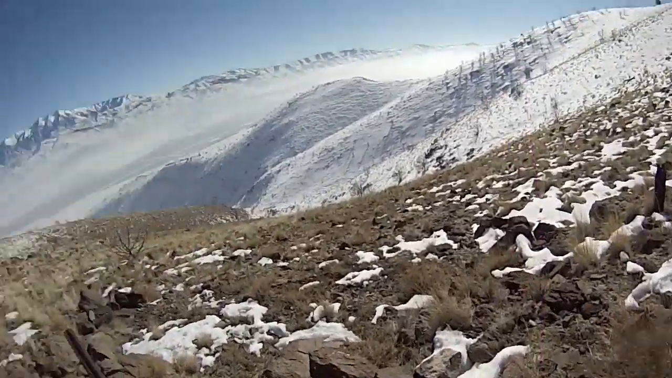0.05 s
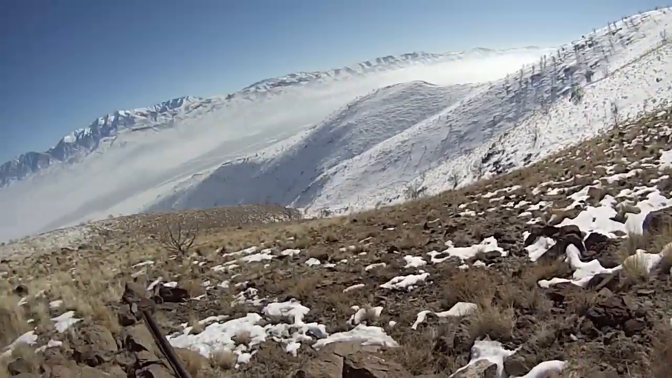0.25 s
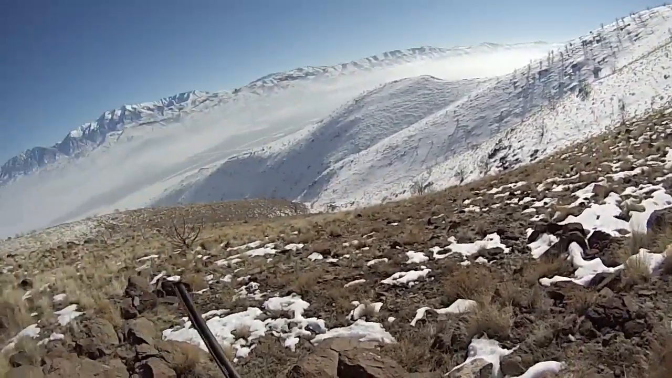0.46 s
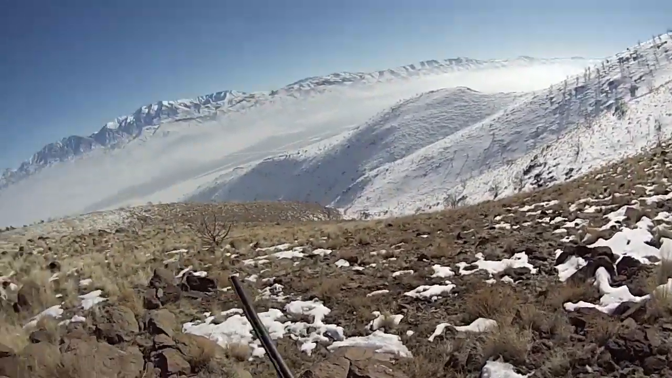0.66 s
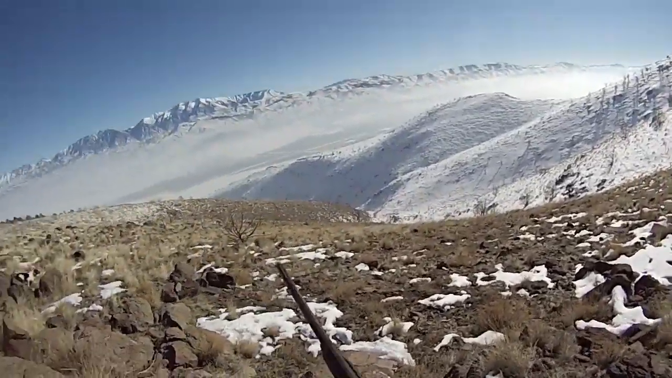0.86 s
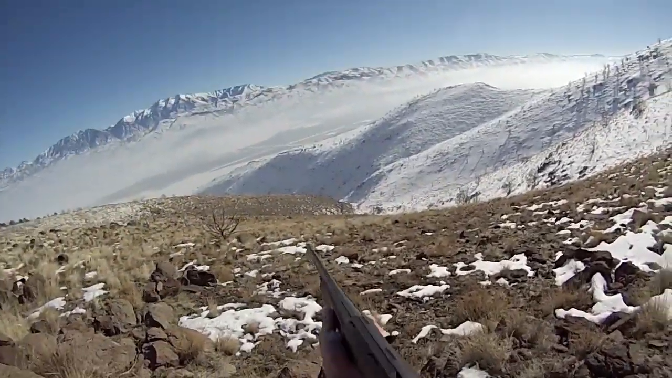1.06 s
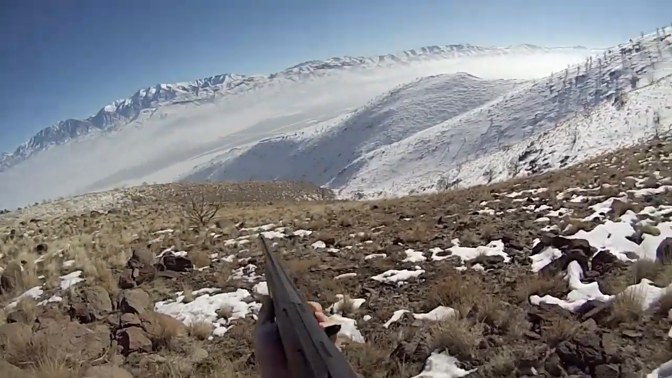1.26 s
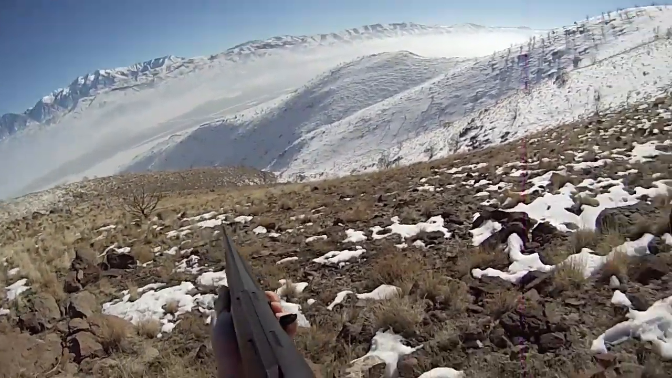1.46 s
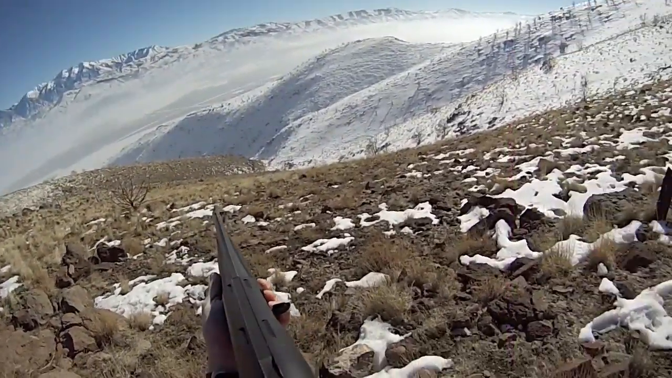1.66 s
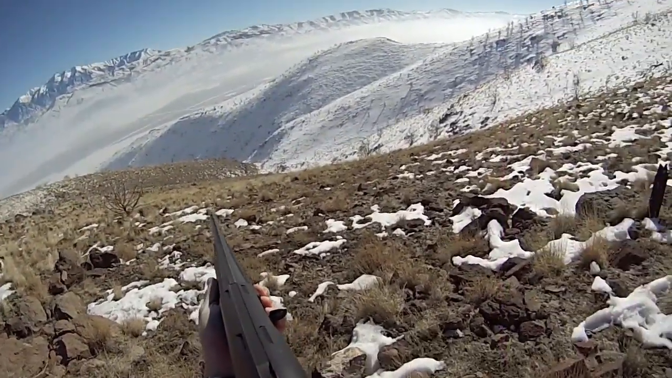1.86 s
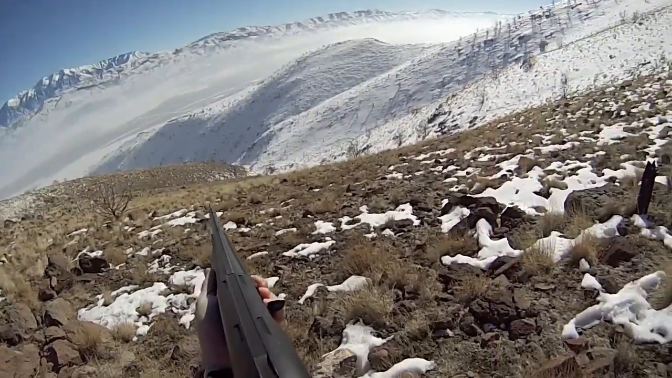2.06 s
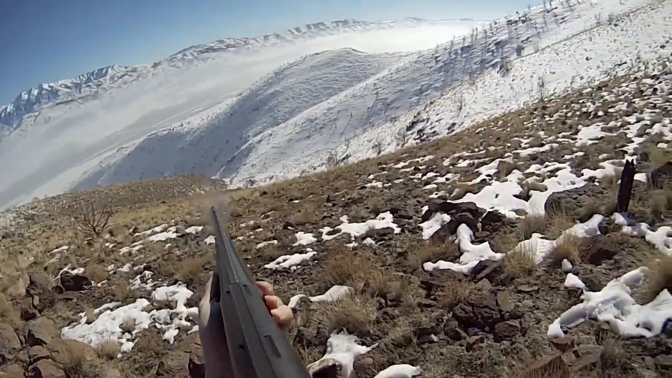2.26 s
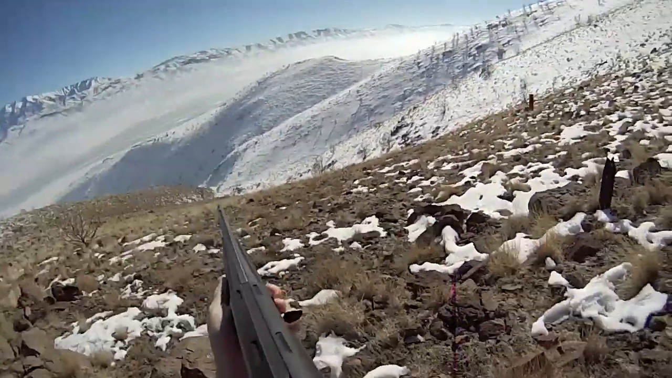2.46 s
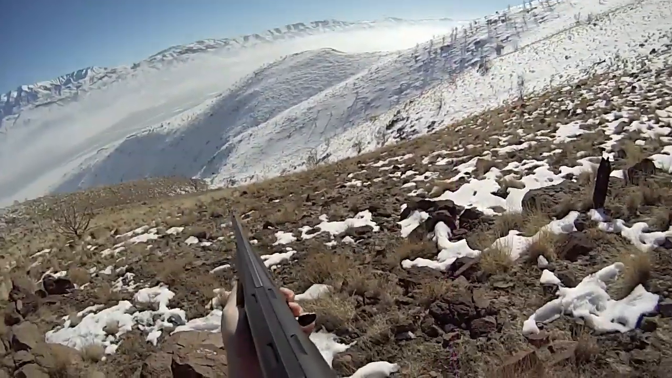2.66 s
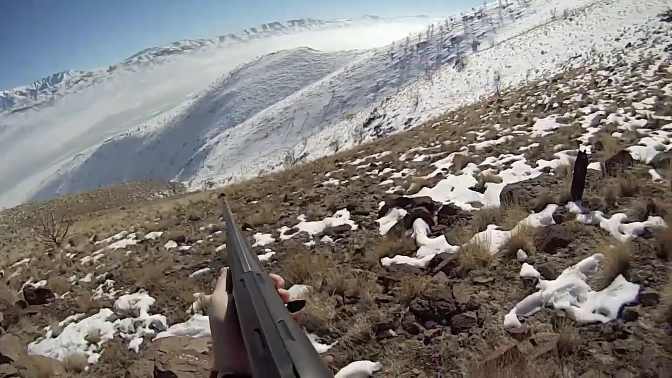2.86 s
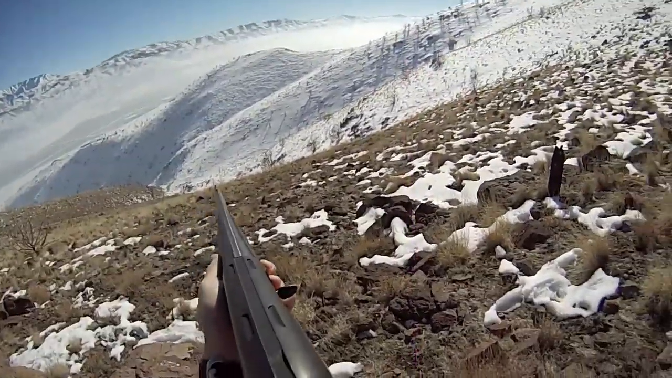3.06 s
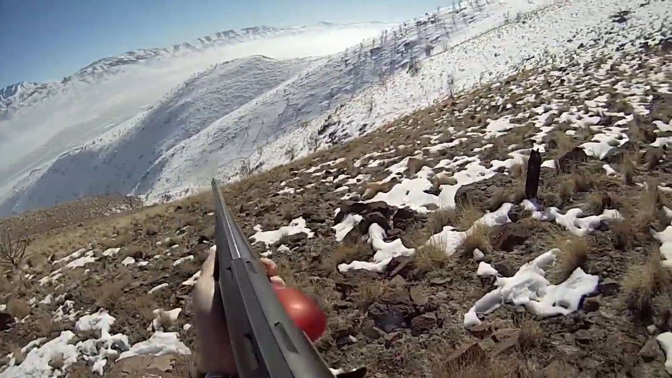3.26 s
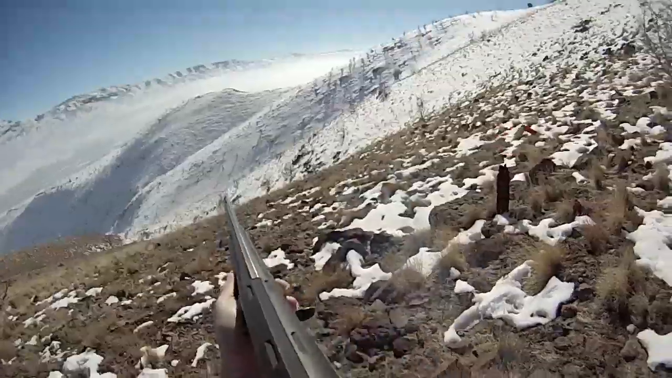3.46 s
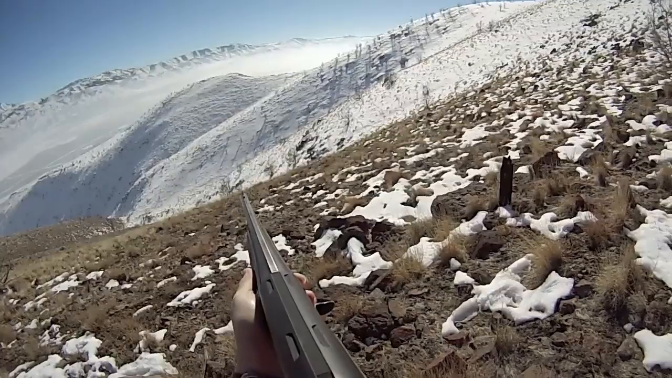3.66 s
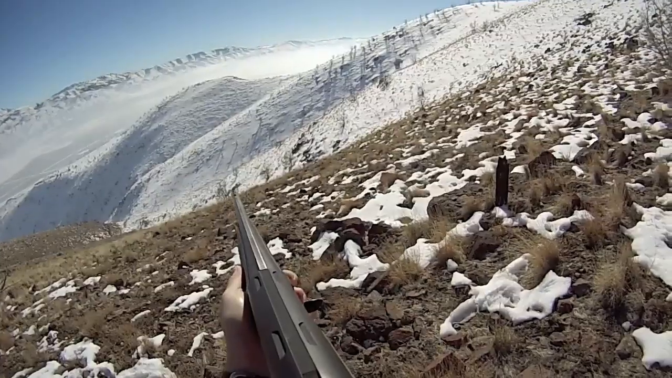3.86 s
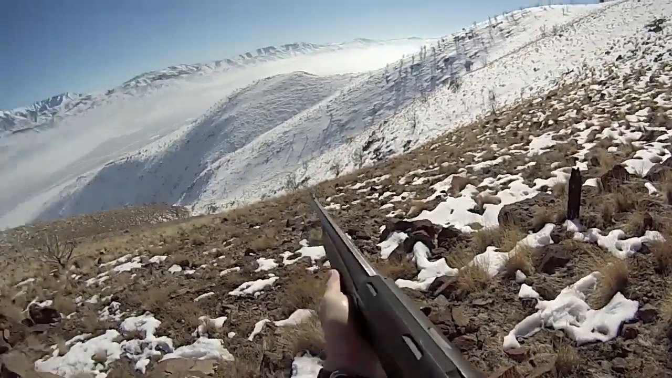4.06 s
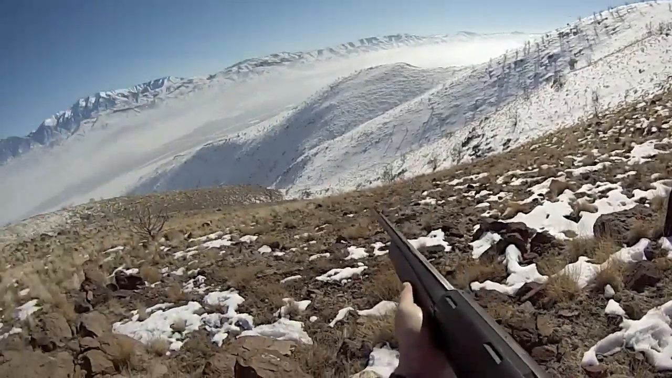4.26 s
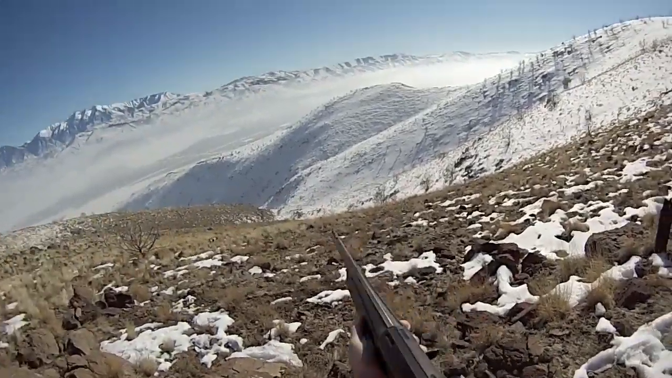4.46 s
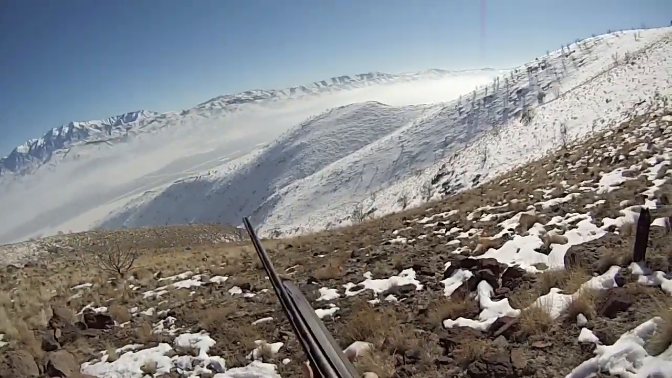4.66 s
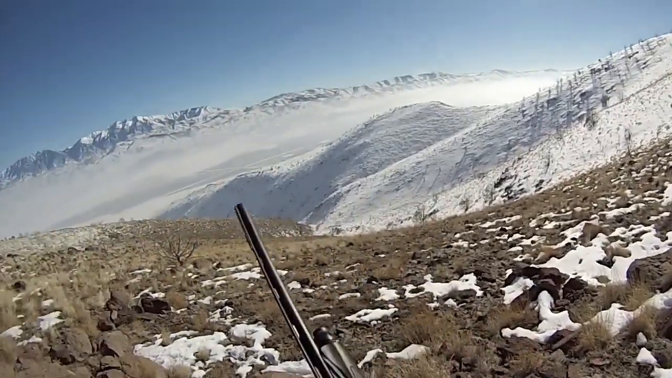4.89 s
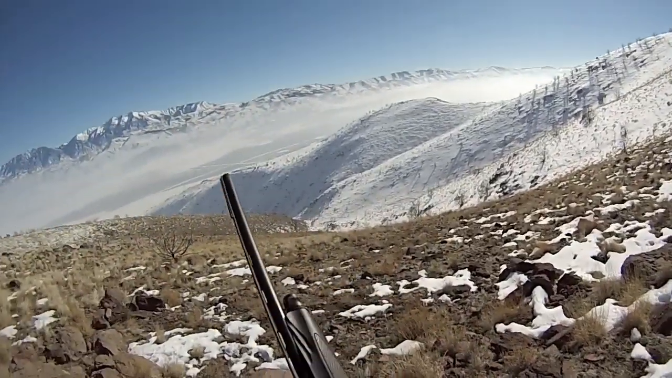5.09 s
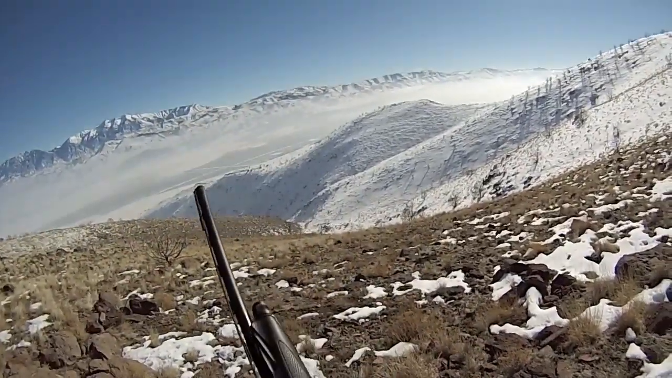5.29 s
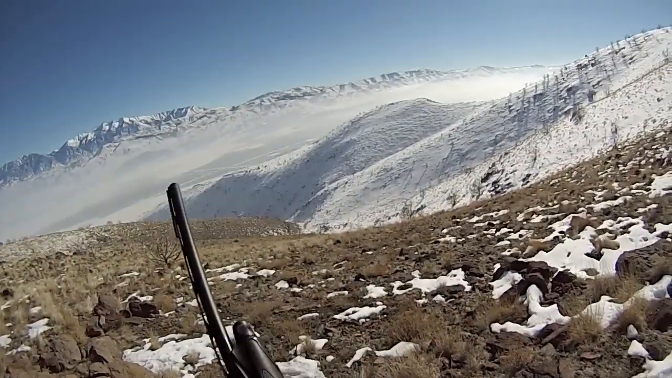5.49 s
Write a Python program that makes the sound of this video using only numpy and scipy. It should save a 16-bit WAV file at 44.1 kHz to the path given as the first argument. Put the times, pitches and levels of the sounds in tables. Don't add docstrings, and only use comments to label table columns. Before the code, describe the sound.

Two overloaded shotgun blasts a second apart, each with bolt clack and thin hillside echo, over low wind buffeting and small handling clicks.

```python
import sys
import numpy as np
from scipy import signal
from scipy.fft import rfft, irfft
from scipy.io import wavfile
from scipy.ndimage import uniform_filter1d

SR = 44100
rng = np.random.default_rng(int(sys.argv[2]) if len(sys.argv) > 2 else 0)


def transcribe(signal):
    frames = np.atleast_2d(signal).T
    limited = np.clip(frames, -1, 1)
    pcm = np.round(limited * 32767).astype(np.int16)
    wavfile.write(sys.argv[1], SR, pcm)


def makeup_ratio(level_db):
    decades = np.asarray(level_db, float) / 20
    return 10 ** decades


N = 243873
T = np.arange(N) / SR

# start_s, level_db, first_pitch_hz, last_pitch_hz, tail_db
BLASTS = [
    (2.3459, 6.5, 517.2, 1624, -13),
    (3.3412, 8, 526.8, 2000, -13.5),
]
BLAST_S, HAMMER_LEAD_S, STOCK_LEAD_S = .0066, .0098, .0036
# centre_s, peak_db, pitch_hz, length_s, direction (+ push, - pull)
JOLTS = [
    (2.359, -16.5, 25.23, 0.017, 0.65),
    (2.446, -11.5, 31, 0.013, -0.79),
    (2.459, -18, 30, .008, 1),
    (2.4728, -9, 45.8, 0.0085, -1.1),
    (2.4728, -27.5, 119, 0.0038, -1.24),
    (3.348, -20, 25.8, 0.0064, 1),
    (3.435, 0, 67.5, 0.0064, 0.22),
    (3.433, -21, 190, 0.0038, 0.75),
    (3.441, -6, 36.7, 0.019, -0.79),
]
# start_s, level_db, t60_s
RUMBLES = [
    (1.299, -49, .15),
    (1.40, -46, .12),
    (2.349, -30.5, 0.3),
    (2.449, -46, 0.75),
    (3.345, -36, 0.13),
    (3.428, -45, 0.71),
]
# start_s, length_s, level_db, fall_s
TRAVEL = [
    (2.361, .105, -37.5, 0.064),
    (3.353, .1, -36.5, .07),
]
# start_s, level_db, length_s
SLAMS = [
    (2.4607, -27, 0.015),
    (3.4500, -32.5, 0.0077),
]
# pitch_hz, t60_s, first_level_db, second_level_db
STEEL_RING = [(3370, .2, -68, -61), (4200, .55, -56, -57), (4721, .55, -63, -57), (5340, .22, -54, -66),
              (5857, .4, -70, -63)]
# level_db, t60_s
ECHO = [
    (-52.5, 1.7),
    (-51.5, 2.06),
]
ECHO_DELAY_S, ECHO_RISE_S, ECHO_TREBLE_DB, ECHO_TREBLE_T60_S = 0.22, 0.028, -4.5, 0.55
# pitch_hz, width_hz, level_db
ECHO_BODY = [
    [(870, 370, -10), (1450, 200, 1.5), (2020, 100, 0), (2400, 360, -7.5)],
    [(3069, 680, -3), (4750, 1700, -6.5), (7040, 1600, -13.5)],
]
# lag_s, peak_db, pitch_hz
RETURNS = [
    [(.242, -29, 2320), (.256, -34, 2336), (.268, -36.5, 2400), (.299, -33.5, 1623), (.304, -39, 2400),
     (.363, -42, 1540), (.397, -49, 1490), (.462, -46.5, 1020), (.5565, -36.5, 1950)],
    [(.234, -38, 1410), (.254, -36, 1690), (.268, -35, 1844), (.293, -39.5, 1900), (.318, -41.5, 1549),
     (.343, -48.5, 1890), (.394, -43, 1950), (.461, -41.5, 987), (.463, -42, 1510), (.54, -42, 1510),
     (.554, -36, 1730), (.674, -49, 1560), (.773, -45, 1450), (.815, -45, 1510)],
]
# start_s, peak_db, treble_db, t60_s
TICKS = [
    (3.1315, -29, -4.5, 0.021),
    (3.1512, -42.5, -7, 0.03),
]
# pitch_hz, width_hz, level_db
TICK_BODY = [(1280, 110, 4), (2340, 160, -11), (3377, 99, 1.5), (3770, 130, 4.5), (4980, 140, 1),
             (6555, 130, 1.5), (7800, 79, -25), (11595, 150, -12)]
# start_s, peak_db, centre_hz, t60_s
SNAPS = [
    (0.634, -45.5, 1900, 0.005),
    (0.6345, -47, 800, .008),
    (1.421, -48, 1500, 0.0087),
    (0.8553, -39.5, 5450, 0.0083),
    (1.343, -45, 1500, 0.015),
    (1.391, -53, 2100, 0.01554),
    (2.5276, -37.5, 4450, 0.008),
    (3.534, -36, 4200, 0.01),
    (3.8973, -45.5, 903, .015),
    (4.5236, -59, 1900, 0.011),
]
# start_s, peak_db, pitch_hz
KNOCKS = [(0.8556, -46, 2600), (0.8534, -42, 1450), (0.9393, -44.5, 1610), (1.3417, -45, 1900),
          (1.383, -43.5, 1580), (1.315, -46, 1610), (1.5614, -50, 1590), (2.526, -36, 1370),
          (3.5327, -36, 935), (4.523, -41.5, 1262), (4.9161, -45, 2006)]
KNOCK_T60_S, RETURN_T60_S, CONTACT_S = 0.028, 0.029, .022
RUSTLE_S, RUSTLE_LENGTH_S, RUSTLE_DB = 1, 0.27, -68
SCUFF_S, SCUFF_LENGTH_S, SCUFF_DB = 1.37, 0.055, -63
# centre_s, length_s, pitch_hz, level_db
WHISTLES = [
    (1.14, .07, 11800, -75),
    (1.13, .06, 9800, -76),
    (3.72, .08, 7000, -71),
    (4.27, .03, 7800, -73),
]
# time_s, level_db
WIND = [(0, -36), (.6, -43.5), (.66, -27), (1.15, -26), (1.3, -19), (1.45, -22), (1.53, -36), (2.3, -35),
        (2.55, -31.5), (2.85, -35), (3.2, -35.5), (3.3, -43), (3.52, -32.5), (3.7, -42), (4.55, -43.5),
        (4.9, -35.5), (5.2, -40.5), (5.53, -50)]
# frequency_hz, density_db (per Hz)
WIND_COLOUR = [(10, -32), (18, -11.5), (30, -2.5), (42, 0), (55, -5), (70, -16.5), (90, -29.5),
               (130, -43.5), (250, -56), (500, -91.5)]
# centre_s, peak_db
GUSTS = [(0.028, -36.5), (0.232, -31.5), (0.459, -33.5), (.67, -35), (.92, -32), (1.02, -26), (1.22, -27),
         (1.28, -24), (1.33, -20), (1.417, -17), (1.759, -33), (2.6, -29), (2.79, -32), (4.06, -40),
         (4.23, -40), (4.65, -35.5), (4.77, -37.5), (4.85, -32), (5.06, -30.5), (5.475, -32)]
GUST_S = 0.016
# pitch_hz, width_hz, level_db
CASE = [(690, 820, -8), (1450, 200, 5), (1900, 91, -0.5), (2293, 200, -0.5), (3600, 760, -13.5),
        (4800, 840, -13), (7300, 300, -23), (10620, 5000, -44)]
# centre_hz, width_hz, depth (0 to 1)
INPUT_DIPS = [(271, 130, 0.7), (914, 180, 0.4)]
# frequency_hz, density_db (per Hz)
HISS = [(59, -35.5), (100, -2.5), (159, -3), (297, -5), (359, -6.5), (646, -10), (718, -9.5), (962, -12),
        (1590, -13), (2860, -18.5), (5840, -24.5), (12400, -33), (15000, -51)]
HISS_DB, TOP_HZ, CUT_HZ = -61.5, 11800, 15500


def unit(x):
    return x / np.sqrt(np.mean(x ** 2))


def peak(x):
    return x / np.abs(x).max()


def noise():
    return rng.standard_normal(N)


def band(x, hz, width_hz):
    hz, width_hz = min(hz, .45 * SR), min(width_hz, .4 * SR)
    return signal.lfilter(*signal.iirpeak(hz, hz / width_hz, SR), x)


def body(x, modes):
    return sum((-1) ** k * makeup_ratio(db) * band(x, hz, width) for k, (hz, width, db) in enumerate(modes))


def coloured(points):
    hz, db = np.transpose(points)
    f = np.maximum(np.fft.rfftfreq(N, 1 / SR), 1)
    gain = makeup_ratio(np.interp(np.log(f), np.log(hz), db))
    return unit(irfft(rfft(noise()) * gain, N))


def fade(start, t60, rise=0.00018):
    out = np.zeros(N)
    first = int(start * SR) + 1
    t = T[first:first + int(2 * t60 * SR)] - start
    out[first:first + len(t)] = (1 - np.exp(-t / rise)) * np.exp(-np.log(1000) * t / t60)
    return out


def gate(start, length, edge=.001):
    return np.clip(np.minimum(T - start, start + length - T) / edge, 0, 1)


def swell(centre, length):
    return np.exp(-((T - centre) / length) ** 2)


def walk(rate):
    k = int(SR / rate)
    held = np.repeat(rng.standard_normal(N // k + 1), k)
    return unit(uniform_filter1d(held, k)[:N])


def shots():
    case = unit(body(noise(), CASE))
    bright = unit(band(noise(), 5000, 3500))
    edge = unit(band(noise(), 2900, 1500))
    steel = unit(band(band(noise(), 6500, 3000), 6500, 3500))
    out = 0
    for s, db, first_hz, last_hz, tail_db in BLASTS:
        t = np.clip(T - s, 0, BLAST_S)
        climb = 1 - np.exp(-np.maximum(t - .0017, 0) / .0009)
        turns = np.cumsum((first_hz + (last_hz - first_hz) * climb) * (T > s)) / SR
        blast = -np.sin(2 * np.pi * turns) + makeup_ratio(-10) * case + makeup_ratio(-13.5) * bright + makeup_ratio(-11.5) * edge
        out = out + makeup_ratio(db) * blast * gate(s, BLAST_S, edge=0.00062) * np.exp(-t / 0.0085)
        out = out + makeup_ratio(-36) * (steel + .5 * bright) * fade(s - HAMMER_LEAD_S, 0.012)
        crack = case + makeup_ratio(-1.5) * bright
        out = out + makeup_ratio(-14) * crack * gate(s - STOCK_LEAD_S, STOCK_LEAD_S, edge=0.002)
        decay = fade(s + BLAST_S, .06, rise=0.0023) + makeup_ratio(-12.5) * fade(s + BLAST_S, 0.28)
        tail = case * makeup_ratio(2.6 * walk(150)) + makeup_ratio(-22.5) * bright + makeup_ratio(-19) * steel
        out = out + makeup_ratio(tail_db) * decay * tail
        out = out + makeup_ratio(-45) * np.sin(2 * np.pi * STEEL_RING[1][0] * T) * fade(s, .3)
    return out


def recoil():
    swings = sum(way * makeup_ratio(db) * np.cos(2 * np.pi * hz * (T - s)) * swell(s, length)
                 for s, db, hz, length, way in JOLTS)
    strap = unit(band(band(noise(), 160, 300), 190, 360))
    return swings + strap * sum(makeup_ratio(db) * fade(s, t60, rise=0.0034) for s, db, t60 in RUMBLES)


def travel():
    slide = unit(body(noise(), CASE))
    for hz, width, db in [(5500, 5000, -7.5), (11000, 6000, -16), (400, 400, -6)]:
        slide = slide + makeup_ratio(db) * unit(band(noise(), hz, width))
    stroke = sum(makeup_ratio(db) * gate(s, length, edge=0.0068) * np.exp(-(T - s).clip(0) / fall)
                 for s, length, db, fall in TRAVEL)
    return slide * makeup_ratio(2 * walk(200)) * stroke


def bolt():
    scrape = unit(body(noise(), CASE)) + makeup_ratio(-4) * unit(band(noise(), 4100, 6600))
    out = 0
    for k, (s, db, length) in enumerate(SLAMS):
        slam = gate(s, length, edge=0.00034) * np.exp(-(T - s).clip(0) / 0.019)
        slam = slam + 0.35 * fade(s + length, 0.011)
        slam = slam + makeup_ratio(-17) * gate(s - .01, 0.0054, edge=.005)
        ring = sum(makeup_ratio(dbs[k]) * np.sin(2 * np.pi * hz * T) * fade(s - .02, t60, rise=.008)
                   for hz, t60, *dbs in STEEL_RING)
        out = out + makeup_ratio(db) * slam * scrape * makeup_ratio(2.2 * walk(400)) + ring
    return out


def slope():
    grain = makeup_ratio(2.5 * walk(110))
    mid, top = (unit(body(noise() * grain, part)) for part in ECHO_BODY)
    out = makeup_ratio(RUSTLE_DB) * swell(RUSTLE_S, RUSTLE_LENGTH_S) * (mid + makeup_ratio(-6.5) * top)
    out = out + makeup_ratio(SCUFF_DB) * swell(SCUFF_S, SCUFF_LENGTH_S) * mid
    for shot, (db, t60) in zip(BLASTS, ECHO):
        s = shot[0] + ECHO_DELAY_S
        low_wash = mid * fade(s, t60, rise=ECHO_RISE_S)
        high_wash = top * fade(s, ECHO_TREBLE_T60_S, rise=ECHO_RISE_S)
        out = out + makeup_ratio(db) * (low_wash + makeup_ratio(ECHO_TREBLE_DB) * high_wash)
    return out


def struck(blows, t60):
    rap, out = noise(), np.zeros(N)
    for s, db, hz in blows:
        span = slice(int(s * SR), int(s * SR) + SR // 8)
        blow = (rap * fade(s, CONTACT_S))[span]
        own = peak(band(band(blow, hz, np.log(1000) / np.pi / t60), hz, hz / 2))
        case = peak(band(body(blow, ECHO_BODY[0] + ECHO_BODY[1][:2]), 1600, 2400))
        out[span] += makeup_ratio(db - 6.5) * (own + makeup_ratio(-3) * case)
    return out


def rocks():
    blows = [(shot[0] + lag, db, hz) for shot, group in zip(BLASTS, RETURNS) for lag, db, hz in group]
    return struck(blows, RETURN_T60_S)


def knocks():
    return struck(KNOCKS, KNOCK_T60_S)


def ticks():
    low, high = (unit(body(noise(), part)) for part in (TICK_BODY[:2], TICK_BODY[2:]))
    return sum(makeup_ratio(db) * peak((low + makeup_ratio(treble_db + 6) * high) * fade(s, t60))
               for s, db, treble_db, t60 in TICKS)


def snaps():
    rap, out = noise(), 0
    for s, db, hz, t60 in SNAPS:
        burst = rap * fade(s, t60, rise=.0002)
        out = out + makeup_ratio(db) * peak(band(band(burst, hz, 0.34 * hz), hz, 1.7 * hz))
    return out


def whistles():
    return sum(makeup_ratio(db) * gate(s - length / 2, length, edge=0.025)
               * unit(band(band(noise(), hz, 120), hz, 200)) for s, length, hz, db in WHISTLES)


def wind():
    force = makeup_ratio(np.interp(T, *np.transpose(WIND)) + 2.5 * walk(12))
    force = force + sum(makeup_ratio(db) * swell(s, GUST_S) for s, db in GUSTS)
    raw = coloured(WIND_COLOUR)
    even = raw / (uniform_filter1d(np.abs(signal.hilbert(raw)), 3000) + 0.2)
    swing = makeup_ratio(-0.95) * unit(even) * force
    bend = band(swing * np.abs(swing), 150, 150)
    spill = np.abs(swing) ** 1.3 * unit(band(band(noise(), 350, 580), 500, 1500))
    return swing + makeup_ratio(-10) * bend + makeup_ratio(-39.5) * spill


def hiss():
    return makeup_ratio(HISS_DB + 1.8 * walk(4.2)) * coloured(HISS)


def scene():
    gun = shots() + recoil() + travel() + bolt()
    hillside = slope() + rocks()
    handling = knocks() + ticks() + snaps() + whistles()
    return (gun + hillside + handling + wind())[None]


def roll_off(x):
    return signal.sosfilt(signal.butter(12, 15600, fs=SR, output="sos"), x)


def record(dry):
    x = dry
    for hz, width, depth in INPUT_DIPS:
        x = x - depth * band(x, hz, width)
    x = x / (1 + np.abs(x) ** 8) ** (1 / 8)
    x = signal.sosfilt(signal.butter(3, TOP_HZ, fs=SR, output="sos"), x)
    x = .88 * x + hiss()
    x = signal.sosfilt(signal.ellip(8, .2, 60, CUT_HZ, fs=SR, output="sos"), x)
    return roll_off(x)


dry = scene()
out = record(dry)
transcribe(out)
```